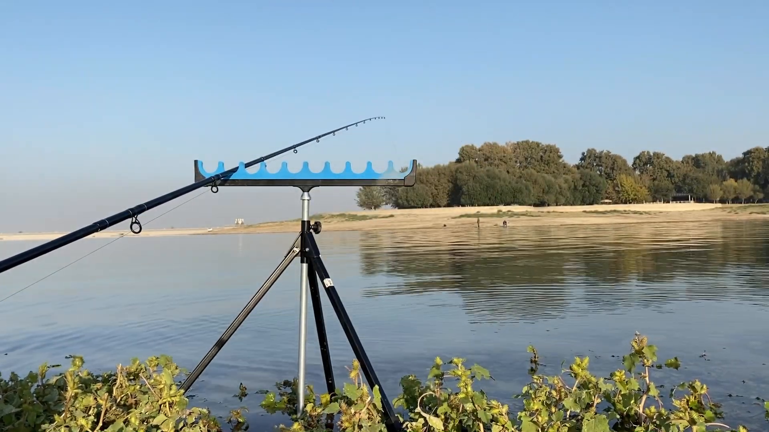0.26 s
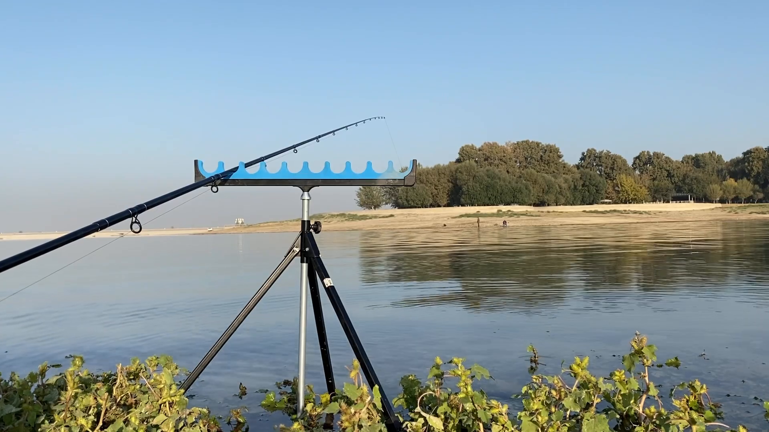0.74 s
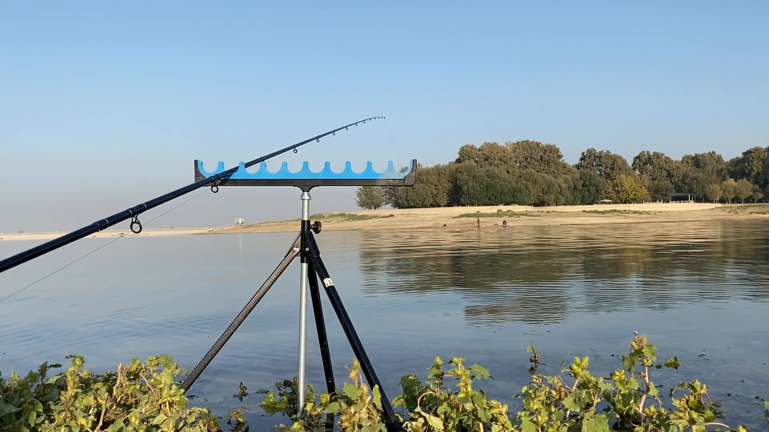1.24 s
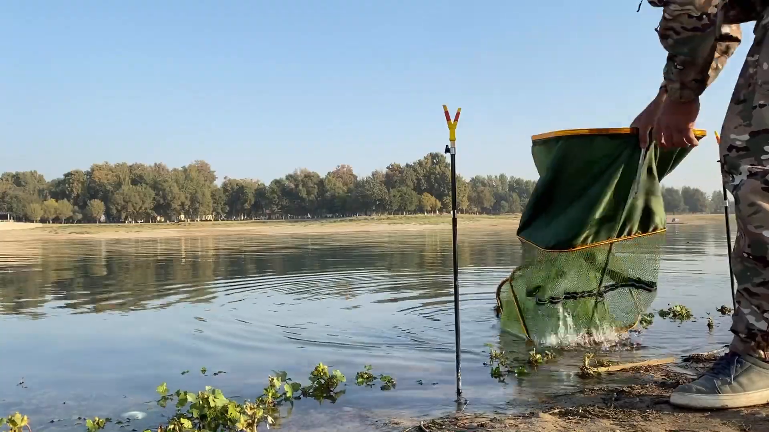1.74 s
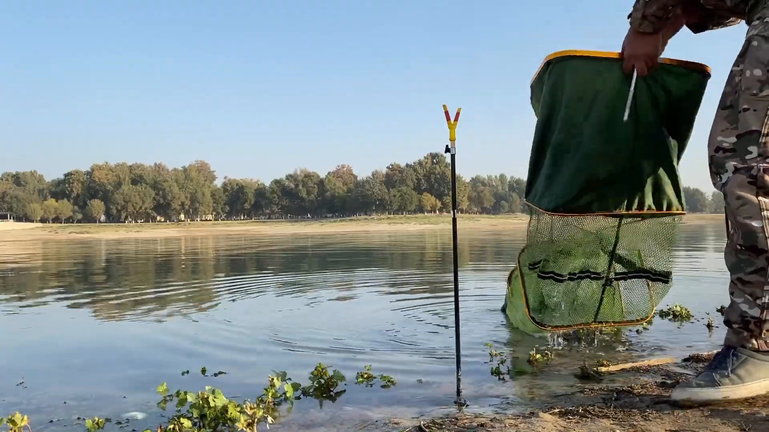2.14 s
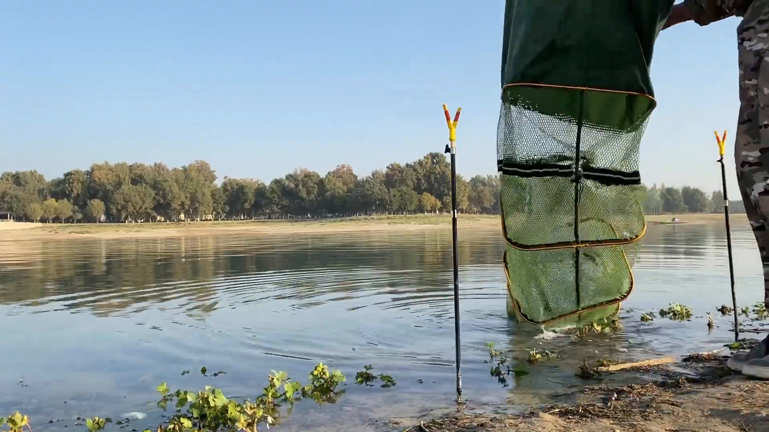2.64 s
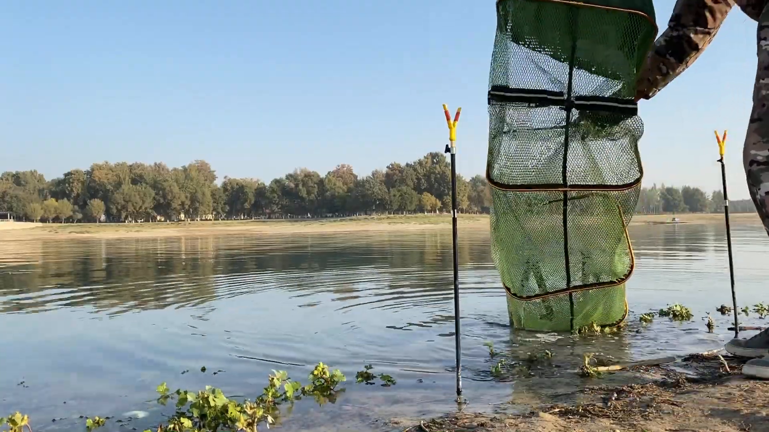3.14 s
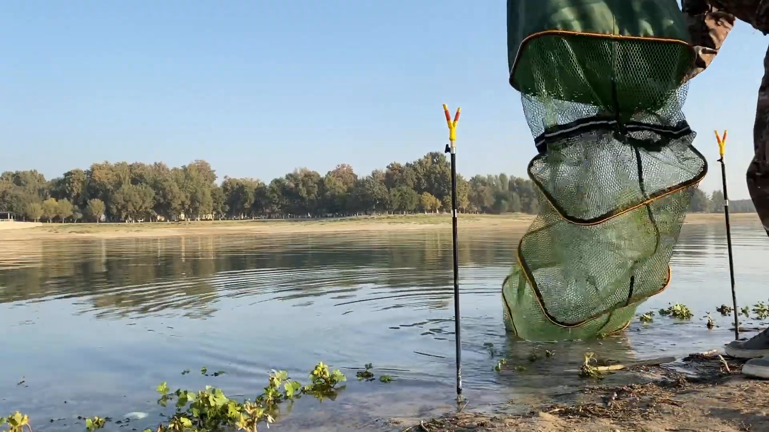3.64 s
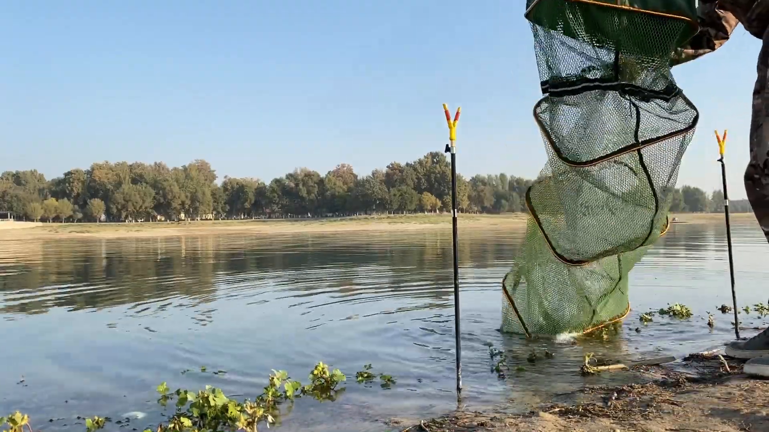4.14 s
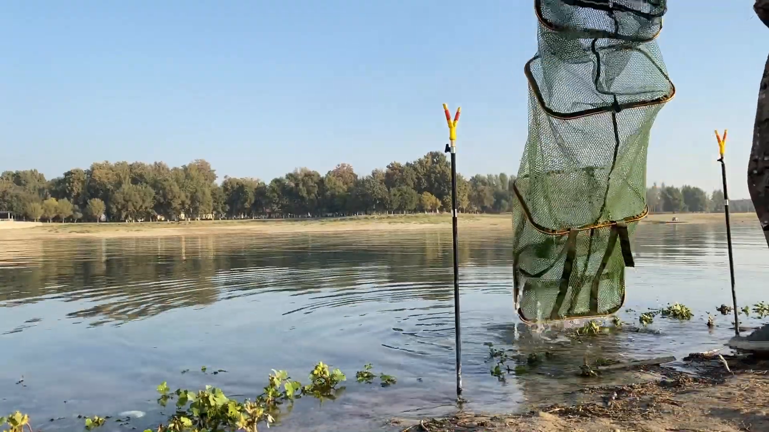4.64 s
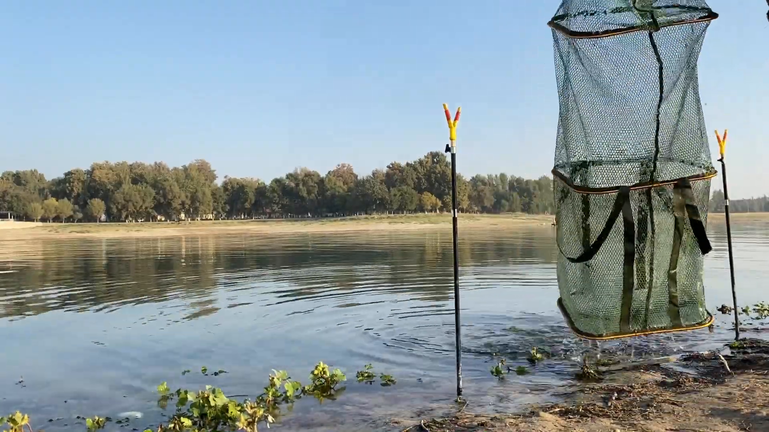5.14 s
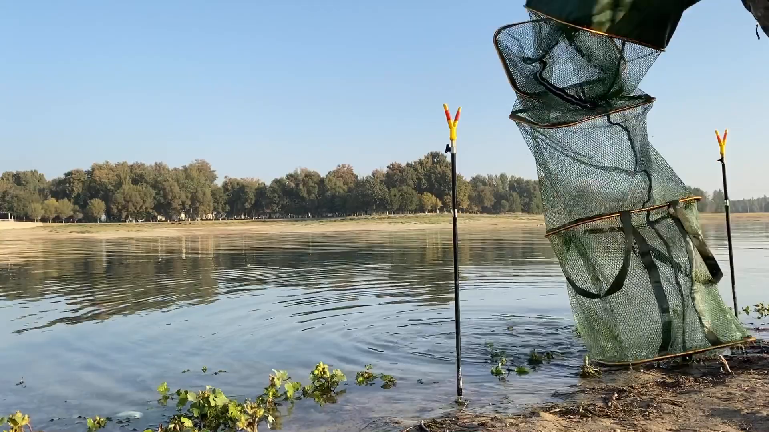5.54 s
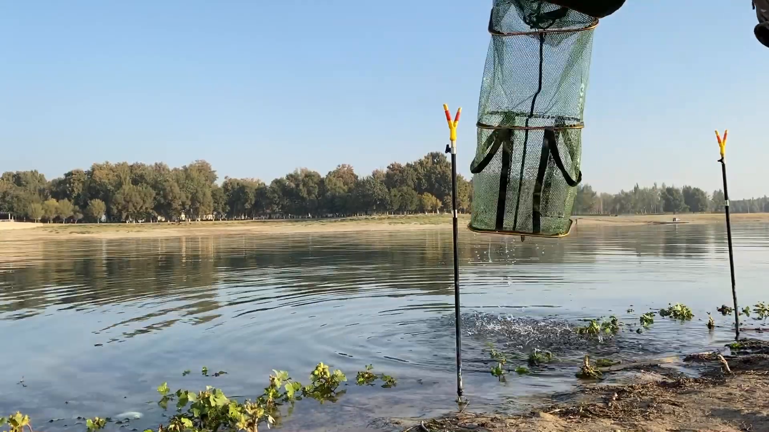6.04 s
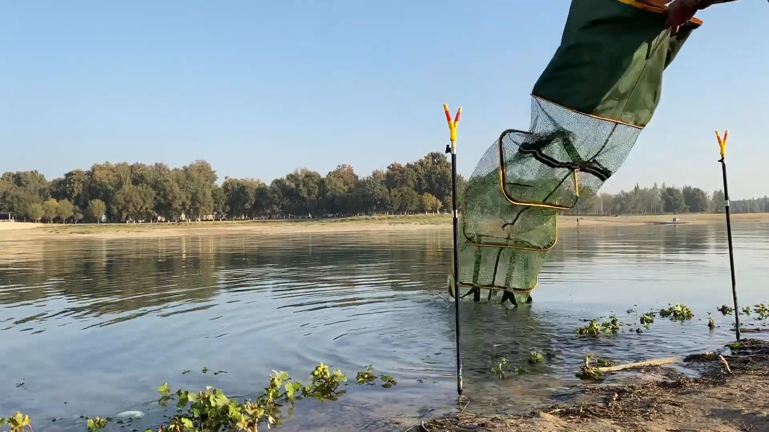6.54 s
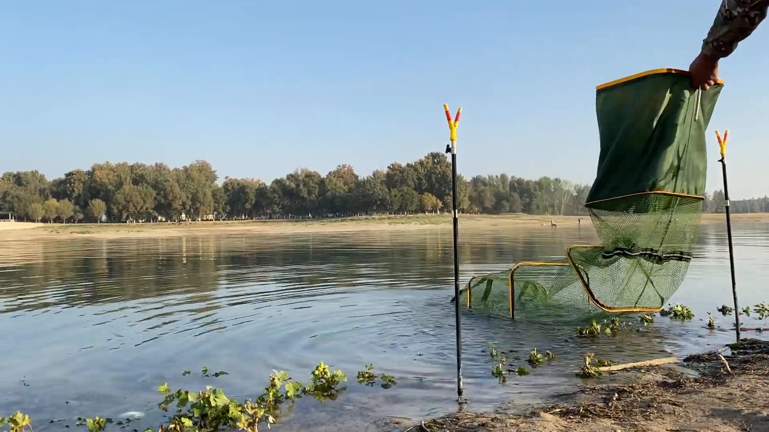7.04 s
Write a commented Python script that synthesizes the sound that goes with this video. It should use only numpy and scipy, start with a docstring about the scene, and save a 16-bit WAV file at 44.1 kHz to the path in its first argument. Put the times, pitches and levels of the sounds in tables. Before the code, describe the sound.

A reel ratchet clicks over a quiet lakeshore hum, then a net is lifted dripping, a sharp crack and footstep sound, and it splashes back.

```python
"""Quiet lakeshore with a far low hum and a faint hiss; a reel ratchet ticks four times, then a small knock.
A jump to a second spot: a lifted net sheds water as spray, drops plink and ring as rising bubbles, something
cracks underfoot, the step crunches and thuds through the bank, and the net slaps back into the shallows.
Air, spray and splashes are shaped noise; bubbles, knock and thud are gliding sines; crack and ratchet are
struck resonances. Crack, crunch and water also scatter off the shore."""
import sys
import numpy as np
from scipy import signal
from scipy.fft import rfft, irfft
from scipy.io import wavfile
from scipy.ndimage import uniform_filter1d

SR = 44100
rng = np.random.default_rng(int(sys.argv[2]) if len(sys.argv) > 2 else 0)


def volts_from_db(level):
    """Convert decibel levels to linear amplitude ratios."""
    exponent = np.asarray(level, float) / 20
    return 10 ** exponent


def master(y):
    """Save y as 16-bit WAV."""
    cut = np.clip(np.atleast_2d(y).T, -1, 1)
    pcm = np.round(cut * 32767)  # scale
    wavfile.write(sys.argv[1], SR, pcm.astype(np.int16))


N = 321577


def evened(x):
    """Scales to rms 1."""
    return x / np.sqrt(np.mean(x ** 2) + 1e-20)


def peak_one(x, t):
    """Scales a burst to a nominal peak of 1: 3.36 times the rms of its first 4 ms."""
    return x / (3.36 * np.sqrt(np.mean(x[..., t < 0.004] ** 2)))


def read(points, hz):
    """Reads a spectrum on a log-frequency axis."""
    f, value = np.transpose(points)
    return np.interp(np.log(hz + 1), np.log(f + 1), value)


def curves(rows):
    """Columns of a table at every sample."""
    s, *columns = np.transpose(rows)
    return [np.interp(np.arange(N) / SR, s, c) for c in columns]


def during(rows):
    """1 while a table lasts, else 0."""
    now = np.arange(N) / SR
    return (now > rows[0][0]) * (now < rows[-1][0])


def add(mix, s, sound):
    """Mixes a sound in at time s."""
    part = mix[..., round(s * SR):][..., :sound.shape[-1]]
    part += sound[..., :part.shape[-1]]


def sides(pan_db):
    """Left and right gains, pan_db apart."""
    return volts_from_db([[pan_db / 2], [-pan_db / 2]])


def resonate(x, hz, width_hz):
    """Resonance of gain 1: shifts hz down to zero, smooths, shifts back."""
    turn = np.exp(2j * np.pi * np.cumsum(hz * np.ones(x.shape[-1])) / SR)
    r = np.exp(-np.pi * width_hz / SR)
    return 2 * (turn * signal.lfilter([1 - r], [1, -r], x / turn)).real


def resonate_twice(x, hz, first_width_hz, second_width_hz):
    """Two resonances in series at one centre: steeper skirts."""
    return resonate(resonate(x, hz, first_width_hz), hz, second_width_hz)


def colour(x, spectrum):
    """Filters by a spectrum, then scales to rms 1."""
    gain = volts_from_db(read(spectrum, np.fft.rfftfreq(x.shape[-1], 1 / SR)))
    return evened(irfft(rfft(x) * gain, x.shape[-1]))


def air(spectrum, same, patchy_db, left_lag_s):
    """Noise from random short-time spectra with drifting patches, partly shared by both ports."""
    frames, hz = N // 512 + 5, np.fft.rfftfreq(2048, 1 / SR)
    a, b, c, d, patches = rng.standard_normal((frames, 1025, 5)).T
    patches = uniform_filter1d(patches, size=24, axis=0)
    patches = evened(uniform_filter1d(patches, size=7, axis=1))
    like = np.clip(read(same, hz), -1, 1)[:, None]
    left = a + 1j * b
    early = left * np.exp(2j * np.pi * hz * left_lag_s)[:, None]
    right = like * early + np.sqrt(1 - like ** 2) * (c + 1j * d)
    z = np.array([left, right]) * volts_from_db(read(spectrum, hz)[:, None] + patchy_db * patches)
    noise = signal.istft(z, nperseg=2048, noverlap=1536)[1][:, :N]
    return evened(noise) * sides(-0.97)


# air spectra of the two spots: f/Hz, relative level/dB
AIR_FIRST = [(15, -73), (25, -43), (37, -47), (57, -16), (81, -13.5), (176, -32), (246, -28.5), (404, -34),
             (510, -33), (662, -33), (815, -37), (1480, -49), (1730, -57), (10400, -66), (12500, -88),
             (16200, -109), (22000, -120)]
AIR_SECOND = [(15, -42), (25, -26), (39, -9.5), (64, 2), (101, -5), (129, -8), (331, -10.5), (482, -16.5),
              (598, -16), (1170, -25), (1710, -42.5), (6920, -45), (8130, -44), (10400, -61), (15500, -57)]
# likeness of the ports: f/Hz, correlation (-1..1)
LIKENESS_FIRST = [(60, 0.99), (300, 0.62), (900, 0.8), (2000, 0.71), (4000, 0.14), (15000, 0.17)]
LIKENESS_SECOND = [(60, 0.97), (150, 0.94), (380, 0.8), (950, 0.28), (2380, -0.085), (5980, -0.99),
                   (15000, 0.5)]
# swell of the far hum: t/s, level/dB
HUM_SWELL = [(0.0, -59), (0.53, -50), (1.3, -48), (1.5, -57.5), (2.3, -57.5), (4.5, -55.5), (7.29, -54)]
AIR_FIRST_DB, AIR_SECOND_DB = -50.5, -49.5
CUT_S, CUT_FADE_S = 1.42, 0.0043
HUM_HZ, HUM_WIDTH_HZ = 79, 29.4


def background():
    """Patchy air noise of the two spots; the far hum is noise through a narrow low resonance."""
    second = np.clip((np.arange(N) / SR - CUT_S) / CUT_FADE_S, 0, 1)
    first_air = volts_from_db(AIR_FIRST_DB) * air(AIR_FIRST, LIKENESS_FIRST, patchy_db=1.7, left_lag_s=-0.00043)
    second_air = volts_from_db(AIR_SECOND_DB) * air(AIR_SECOND, LIKENESS_SECOND, patchy_db=1.06, left_lag_s=0)
    hum = evened(resonate_twice(rng.standard_normal(N), HUM_HZ, HUM_WIDTH_HZ, HUM_WIDTH_HZ))
    hum = volts_from_db(curves(HUM_SWELL)[0]) * hum * sides(-3.3)
    return (1 - second) * first_air + second * second_air + hum


# pawl strikes: t/s, nominal peak/dB
PAWL_STRIKES = [(0.2299, -31), (0.249, -35.5), (0.2756, -34), (0.3067, -33.5)]
# resonances of the reel body: f/Hz, width/Hz, level/dB
REEL_BODY = [(2080, 130, -6), (2350, 170, 3.5), (3050, 70, 0), (3630, 18, -8.5), (5210, 460, 6.5),
             (7370, 310, 5), (9700, 760, -1), (11300, 230, -1)]


def ratchet():
    """The pawl strikes, then chatters for some milliseconds inside the resonant reel body."""
    mix, t = np.zeros((2, N)), np.arange(3000) / SR
    for (s, db), puff in zip(PAWL_STRIKES, rng.standard_normal((4, 2, 3000))):
        chatter = (puff + 0.27 * puff[::-1]) * volts_from_db(-60 * t / 0.071)  # ports partly shared
        strike = chatter + 22 * (t == 0)
        tick = 0
        for hz, width_hz, mode_db in REEL_BODY:
            mode = resonate_twice(strike, hz, width_hz, 3 * width_hz)
            tick = tick + volts_from_db(mode_db) * np.sqrt(SR / width_hz) * mode
        add(mix, s, volts_from_db(db) * peak_one(tick, t))
    return mix


# splits, then bounces off ground and water: t/s, peak/dB
CRACK_SPLITS = [(2.35, -21.5), (2.3507, -7), (2.3514, -8), (2.3535, -15), (2.3576, -31), (2.361, -38)]
# what the crack rings with: f/Hz, width/Hz, level/dB
CRACK_MODES = [(1480, 1030, 1.5), (2250, 850, 4.5), (3220, 870, -5), (4700, 660, -8), (6100, 2100, -0.5),
               (8840, 2500, 3.5), (15000, 4200, 0.5)]


def crack():
    """Each split is a click and a brief puff of noise, ringing broad resonances."""
    mix, t = np.zeros(N), np.arange(1200) / SR
    for (s, db), puff in zip(CRACK_SPLITS, rng.standard_normal((len(CRACK_SPLITS), 1200))):
        burst = (t == 0) + 0.25 * puff * np.exp(-t / 0.0007)
        snap = 0
        for hz, width_hz, mode_db in CRACK_MODES:
            snap = snap + volts_from_db(mode_db) * resonate_twice(burst, hz, width_hz, 2 * width_hz) / width_hz
        add(mix, s, volts_from_db(db) * snap / abs(snap).max())
    return mix


# step's crunch, darkening as weight settles: t/s, level/dB, centre f/Hz
CRUNCH_PATH = [(2.399, -48, 795), (2.405, -25.5, 660), (2.414, -38, 570), (2.421, -26, 507),
               (2.435, -35.5, 330), (2.455, -36.5, 260), (2.475, -45, 200), (2.52, -55, 200),
               (2.6, -67, 197)]


def crunch():
    """Grit noise through a sinking resonance, with a fixed brighter edge."""
    crunch_db, centre_hz = curves(CRUNCH_PATH)
    grit = rng.standard_normal(N)
    body = evened(resonate_twice(grit, centre_hz, 450, 940))
    edge = evened(resonate_twice(grit, 1000, 910, 2500))
    return volts_from_db(crunch_db) * (body + 0.27 * edge) * during(CRUNCH_PATH)


# thud in the bank: t/s, level/dB, pitch f/Hz
THUD_PATH = [(2.43, -50, 100), (2.445, -36, 90), (2.46, -49, 72), (2.468, -21.5, 62.6), (2.484, -26, 62.6),
             (2.5, -27.5, 67), (2.52, -40, 69), (2.57, -39, 65), (2.63, -50, 60)]
FULL_WEIGHT_S = 2.484


def thud():
    """Gliding low tone with its octave in phase: sharp dips, flat crests."""
    thud_db, thud_hz = curves(THUD_PATH)
    turns = np.cumsum(thud_hz) / SR
    angle = 2 * np.pi * (turns - turns[round(FULL_WEIGHT_S * SR)])  # a dip falls at full weight
    wave = -(np.cos(angle) + 0.41 * np.cos(2 * angle))
    return volts_from_db(thud_db) * wave * during(THUD_PATH) * sides(-2.4)


def bubble(hz, t60_s, rise, phase_turns=0):
    """A damped sine whose pitch climbs as the bubble nears the surface."""
    t = np.arange(3000) / SR
    t60_s = max(t60_s, 0.003)
    t = np.minimum(t, 1.2 * t60_s)  # all but silent by then
    turns = hz * (t + rise * t ** 2 / t60_s)
    return np.sin(2 * np.pi * (turns + phase_turns)) * volts_from_db(-60 * t / t60_s) * (1 - np.exp(-t / 0.00079))


def grains(per_s, spread_db):
    """A sparse train of clicks, a few of them large."""
    return volts_from_db(spread_db * np.minimum(rng.exponential(1, N), 4)) * (rng.random(N) < per_s / SR)


SPUTTER_DB, SPUTTER_S = 2, 0.027  # rms swing, smoothing span


def sputter():
    """Random quick swings of level in dB: the stream comes in gulps."""
    span = round(SPUTTER_S * SR)
    swing = uniform_filter1d(uniform_filter1d(rng.standard_normal(N), span), span)
    return SPUTTER_DB * evened(swing)


# water leaving the net in surges: t/s, gurgle level/dB, spray level/dB
NET_FLOW = [(1.42, -76, -74.5), (1.63, -62.5, -58.5), (1.68, -55, -60.5), (1.86, -56.5, -64.5),
            (1.95, -57.5, -59), (2.2, -57, -55.5), (2.33, -60.5, -67.5), (2.55, -72.5, -69),
            (3.1, -69.5, -72.5), (3.45, -74.5, -73), (3.85, -81.5, -77), (4.2, -65.5, -68),
            (4.45, -61, -64), (4.75, -51, -60.5), (4.9, -61.5, -62), (5.15, -65.5, -61.5),
            (5.3, -65.5, -66), (5.5, -64, -57), (5.58, -74.5, -67), (5.65, -47, -59.5), (5.7, -64, -63),
            (5.97, -56.5, -56.5), (6.25, -78, -63.5), (6.49, -64.5, -63), (6.53, -50, -46.5),
            (6.61, -47.5, -42), (6.64, -52.5, -53), (6.7, -45.5, -44.5), (6.77, -48.5, -60.5),
            (7.01, -72, -71), (7.29, -82, -71.5)]
# faint treble hiss at the first spot: t/s, level/dB
FIRST_HISS = [(0.325, -65), (0.345, -83), (0.445, -75), (0.48, -92), (0.93, -73.5), (1.22, -84),
              (1.41, -103)]
# water pushed aside by the net: t/s, level/dB
NET_SLOSH = [(6.38, -67), (6.42, -63), (6.444, -55), (6.612, -60), (6.66, -52), (6.776, -50.5), (7.0, -66)]
# filters on bubble swarm and droplets: f/Hz, relative level/dB
GURGLE_COLOUR = [(290, -37), (500, -5), (849, -9.5), (1940, 0), (2290, -1.5), (2740, 1.5), (3130, -1.5),
                 (7000, -15.5), (9100, -45), (15400, -120)]
SPRAY_COLOUR = [(1470, -34), (2500, -22), (2970, -11.5), (3560, -11), (5050, -11), (5570, -8), (6740, -6),
                (8420, -5), (10300, -5.5), (12000, -9), (16000, -15)]


def stream():
    """Swarms of small bubbles and fine droplets follow the flow; the plunge adds a low slosh."""
    gurgle_db, spray_db = curves(NET_FLOW)
    swarm, train, kind = np.zeros(N), grains(per_s=1400, spread_db=2.5), rng.integers(0, 32, N)
    for k, (hz, rise) in enumerate(zip(np.geomspace(600, 6500, 32), rng.uniform(0.091, 1.38, 32))):
        ring = np.sqrt(hz) * bubble(hz, 30 / hz, rise)
        swarm += signal.oaconvolve(train * (kind == k), ring)[:N]
    churn = colour(swarm, GURGLE_COLOUR) + 0.39 * colour(rng.standard_normal(N), GURGLE_COLOUR)
    gurgle = during(NET_FLOW) * volts_from_db(gurgle_db + sputter()) * churn

    droplets = grains(per_s=1800, spread_db=8.5) * rng.choice([-1, 1], N)
    droplets = droplets + 2.26 * rng.standard_normal(N)
    spray_gain = during(NET_FLOW) * volts_from_db(spray_db + sputter())
    hiss_gain = during(FIRST_HISS) * volts_from_db(curves(FIRST_HISS)[0])
    fizz = (spray_gain + hiss_gain) * colour(droplets, SPRAY_COLOUR)

    slosh = evened(resonate(resonate(rng.standard_normal(N), 400, 670), 460, 930))
    slosh = during(NET_SLOSH) * volts_from_db(curves(NET_SLOSH)[0]) * slosh
    return gurgle + fizz + slosh


def crowd(count, level_db, spread_db, lo_hz, hi_hz):
    """Random drops while the net drains: time, peak by the flow, pitch, and a share 0-1."""
    when, size, pitch, share = rng.random((count, 4)).T
    s = NET_FLOW[0][0] + when * (NET_FLOW[-1][0] - NET_FLOW[0][0])
    db = level_db[np.minimum(s * SR, N - 1).astype(int)] + spread_db * size ** 2
    return s, db, lo_hz * (hi_hz / lo_hz) ** pitch, share


# clearest bubbles, and first a small knock near 1.2 kHz after the ratchet:
# t/s, peak/dB, starting f/Hz, ring t60/s (3 ms at least), pitch rise at half the ring (share)
KNOCK_AND_BUBBLES = [(0.319, -54.5, 1180, 0.013, .1), (1.6669, -37, 1660, 0.021, 0.27),
                     (1.6731, -32.5, 1570, 0.0084, 0.43), (1.8122, -41, 3370, .011, 0.09),
                     (1.8253, -44.5, 1480, 0.058, 0.91), (1.8527, -38, 2230, 0.014, .12),
                     (1.9719, -42.5, 1430, .028, 0.12), (1.999, -39, 3000, 0.026, 1),
                     (2.0985, -46, 1230, 0.15, 0.78), (2.156, -42, 1990, .012, .1),
                     (2.5881, -50, 1990, .025, 0.7), (2.7888, -48, 970, 0.015, 0.52),
                     (2.9038, -40.5, 1130, 0.01, 0.16), (2.9141, -55, 3800, 0.017, .35),
                     (3.034, -49, 1500, 0.017, 0.092), (3.0643, -48, 4370, 0.0068, 0.3),
                     (3.167, -53.5, 3980, 0.0098, .11), (3.2143, -38, 6050, 0.0064, .09),
                     (3.2586, -51, 3580, 0.015, 1.4), (3.2976, -54, 4580, .014, .1),
                     (3.6033, -50, 2400, 0.0085, 0.42), (4.2124, -46, 1880, .045, 0.064),
                     (4.2228, -47.5, 2730, .009, 0.71), (4.4394, -44, 1250, 0.061, .09),
                     (4.4845, -40, 2260, .014, .48), (4.4925, -37.5, 2360, 0.013, 0.83),
                     (4.5168, -47, 874, 0.096, 0.74), (4.5917, -39, 2140, 0.0099, .11),
                     (4.6409, -43, 2700, .011, 0.73), (4.6507, -42, 1310, 0.035, .1),
                     (4.6699, -42, 1800, .025, .42), (4.7369, -37.5, 1640, .016, .25),
                     (4.8011, -42, 1150, .025, 0.7), (4.8435, -33, 1260, 0.014, 2.3),
                     (4.849, -32.5, 2700, 0.013, 0.11), (4.8947, -42.5, 1540, .03, .8),
                     (4.9146, -42, 4240, .011, 0.55), (4.9368, -46, 1180, 0.035, 0.47),
                     (4.938, -45, 2220, .02, .1), (4.95, -48, 1600, 0.039, 2),
                     (5.013, -46.5, 2120, .014, .1), (5.1351, -42, 3620, 0.0074, .1),
                     (5.1554, -37, 3020, 0.0085, .1), (5.2065, -48, 1820, 0.023, 0.38),
                     (5.2439, -47, 3560, 0.018, 0.24), (5.6368, -37, 1780, .017, .1),
                     (5.6526, -34, 1680, 0.013, 1.07), (5.6629, -40, 1380, .018, 1.8),
                     (5.7731, -47.5, 1454, .037, .1), (5.9403, -42, 4700, .014, .26),
                     (5.7986, -47, 2060, .04, 1.2), (5.9474, -43.5, 1090, 0.029, .44),
                     (5.9635, -52, 1660, .017, 1.5), (5.9848, -46, 1300, 0.012, 0.86),
                     (6.0301, -45.5, 1020, 0.053, 0.73), (6.0682, -50, 2290, 0.019, .1),
                     (6.0778, -51, 1700, .034, 0.29), (6.112, -51.5, 2390, 0.031, 0.48),
                     (6.1549, -38, 3920, 0.0048, 0.91), (6.1702, -49, 1850, 0.017, 0.76),
                     (6.441, -44, 316, .039, .28), (6.4464, -44, 1130, 0.037, 0.089),
                     (6.497, -47, 315, 0.05, .18), (6.5259, -41, 1700, .01, 0.1),
                     (6.5691, -44, 940, .025, .31), (6.5925, -26.5, 1150, 0.0099, .27),
                     (6.6052, -29.5, 2870, .014, 0.71), (6.635, -35.5, 240, 0.03, .23),
                     (6.6705, -38, 906, 0.02, 1.2), (6.709, -44, 517, .057, 0.21),
                     (6.7559, -35.5, 1380, 0.014, .1), (6.761, -39, 500, 0.06, 0.23),
                     (6.7868, -43, 2740, .011, .4), (6.8463, -39, 1970, .015, .1),
                     (6.852, -43, 644, 0.046, .23)]
# short noise puffs: light ones at the first spot, then the clearest drops smacking the surface:
# t/s, nominal peak/dB, centre f/Hz
CLEAR_SMACKS = [(0.3274, -52, 9680), (0.3556, -55, 9490), (0.3641, -56, 9860), (0.377, -50, 10500),
                (0.4294, -56.5, 7570), (1.6671, -33, 1990), (1.8123, -38, 1930), (1.924, -36, 1900),
                (1.9936, -55, 10900), (2.5207, -45, 1330), (2.596, -43.5, 1270), (2.7886, -57, 980),
                (2.9038, -55, 1230), (2.958, -50, 3500), (3.0635, -45.5, 5000), (3.1883, -47, 5000),
                (3.2586, -47, 3500), (3.2976, -45, 4040), (3.6093, -47, 5970), (3.8928, -51, 7600),
                (4.2228, -50, 3000), (4.4603, -37, 1420), (4.6409, -43, 3500), (4.6938, -37, 10900),
                (4.7034, -40, 1300), (4.8444, -32, 2680), (4.8789, -40, 4500), (4.9146, -42, 4500),
                (4.9448, -40, 10400), (5.0431, -39.5, 6860), (5.0785, -39, 10600), (5.2561, -41.5, 7600),
                (5.3747, -41.5, 1150), (5.6191, -38, 2110), (5.6366, -35, 1770), (5.6521, -35, 1820),
                (5.9194, -32.5, 2480), (5.9684, -42, 10900), (6.0188, -46, 7520), (6.154, -39, 4830),
                (6.2144, -42.5, 7600), (6.3211, -40.5, 11000), (6.4467, -39.5, 1170),
                (6.5082, -33.5, 10700), (6.5261, -24.5, 1670), (6.569, -37, 1070), (6.5721, -27.5, 6670),
                (6.6044, -24, 2170), (6.6075, -27.5, 5000), (6.6707, -41, 945), (6.786, -30, 2860),
                (6.8458, -38.5, 2080)]
DROP_SPREAD_DB, SCATTER_DB = 11, 2  # spread of sizes; left-right scatter
DRIPS, DRIP_OVER_GURGLE_DB, DRIP_LO_HZ, DRIP_HI_HZ = 420, 3, 1050, 5500
DRIP_CYCLES, DRIP_MOST_RISE = 55, 0.7  # t60 in cycles; share
TICKS, TICK_OVER_SPRAY_DB, TICK_LO_HZ, TICK_HI_HZ = 140, 8.5, 3000, 11000
SMACK_T60_1KHZ_S, SMACK_SHORTENS = 0.055, 0.54  # power of pitch by which the ring shrinks


def drops():
    """Bubbles, and one early knock, ring as rising tones; smacks are short puffs of band noise."""
    mix, t = np.zeros((2, N)), np.arange(3000) / SR
    gurgle_db, spray_db = curves(NET_FLOW)
    s, db, hz, share = crowd(DRIPS, gurgle_db + DRIP_OVER_GURGLE_DB, DROP_SPREAD_DB, DRIP_LO_HZ, DRIP_HI_HZ)
    drips = zip(s, db + read(GURGLE_COLOUR, hz), hz, DRIP_CYCLES / hz, DRIP_MOST_RISE * share ** 2)
    tones = KNOCK_AND_BUBBLES + list(drips)
    ticks = crowd(TICKS, spray_db + TICK_OVER_SPRAY_DB, DROP_SPREAD_DB, TICK_LO_HZ, TICK_HI_HZ)[:3]
    smacks = CLEAR_SMACKS + list(zip(*ticks))
    for (s, db, hz, t60_s, rise), (phase, pan) in zip(tones, rng.random((len(tones), 2))):
        tone = bubble(hz, t60_s, rise, phase)
        add(mix, s, volts_from_db(db) * tone / abs(tone).max() * sides(SCATTER_DB * (2 * pan - 1)))
    for (s, db, hz), puff in zip(smacks, rng.standard_normal((len(smacks), 3000))):
        t60_s = SMACK_T60_1KHZ_S * (1000 / hz) ** SMACK_SHORTENS
        burst = puff * volts_from_db(-60 * t / t60_s) * (1 - np.exp(-t / 0.00081))
        smack = peak_one(resonate_twice(burst, hz, 0.48 * hz, 7.2 * hz), t)
        add(mix, s, volts_from_db(db) * smack * sides(SCATTER_DB * puff[0]))
    return mix


def shore(x, t60_s):
    """Short scatter from bank and water: decaying random taps, different at each port."""
    taps = np.zeros((2, 4400))
    at = np.arange(60, 4380, 20) + rng.integers(0, 20, (2, 216))
    np.put_along_axis(taps, at, rng.choice([-1., 1.], at.shape), 1)
    taps = taps * volts_from_db(-60 * np.arange(4400) / SR / t60_s)
    return signal.fftconvolve(x, taps / np.linalg.norm(taps[0]), axes=1)[:, :N]


# phase between the ports: f/Hz, left lead/rad
PORT_LEAD = [(0, 0), (1720, -0.6), (3270, 0.2), (5510, -0.2), (5860, -1.9), (6890, -0.5), (8010, -3.0),
             (9650, -4.7), (10400, -6.1), (11500, -6.6), (12700, -9.2), (14300, -9.7), (15200, -12.5),
             (15900, -12.6)]
# level between the ports: f/Hz, left minus right/dB
PORT_BALANCE = [(60, -6), (110, -4), (200, 1), (380, -4.5), (700, -4), (1290, -5.5), (2380, -1.5),
                (4400, 6), (8120, -2.5), (15000, 2.5)]


def ports(x):
    """Sound from the right reaches the two ports with its own delay and shading."""
    hz = np.fft.rfftfreq(N, 1 / SR)
    half = volts_from_db(read(PORT_BALANCE, hz) / 2) * np.exp(0.5j * np.interp(hz, *np.transpose(PORT_LEAD)))
    return irfft(rfft(x) * np.array([half, 1 / half]), N)


def scene():
    """All sources; crack, crunch and water gain shore echoes and pass the ports."""
    near = crack() + crunch()
    water = stream() + drops()
    echoes = shore(volts_from_db(-6.5) * near + volts_from_db(-8.5) * water, t60_s=0.054)
    return background() + thud() + ratchet() + ports(near + water + echoes)


# microphone response: f/Hz, gain/dB
MIC_RESPONSE = [(20, -20), (45, -0.5), (12000, 0), (12700, -5), (13300, -22.5), (14000, -2), (14800, -5.5),
                (15800, -11), (16100, -53)]


def low_pass(x):
    """Removes everything above the highest recorded frequency."""
    return signal.sosfilt(signal.butter(12, 16380, fs=SR, output="sos"), x)


def record(dry):
    """Colours the mix by the microphone response."""
    heard = irfft(rfft(dry) * volts_from_db(read(MIC_RESPONSE, np.fft.rfftfreq(N, 1 / SR))), N)
    return low_pass(heard)


dry = scene()
out = record(dry)
master(out)
```